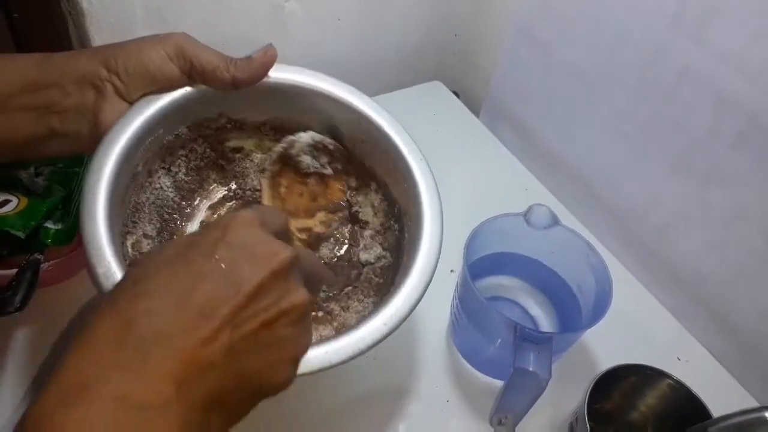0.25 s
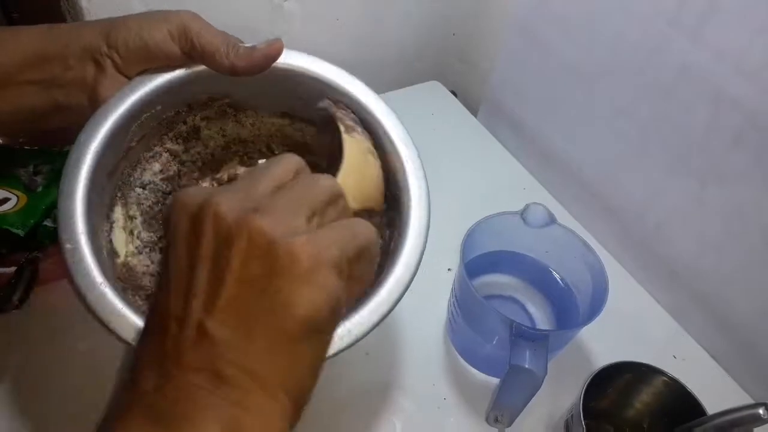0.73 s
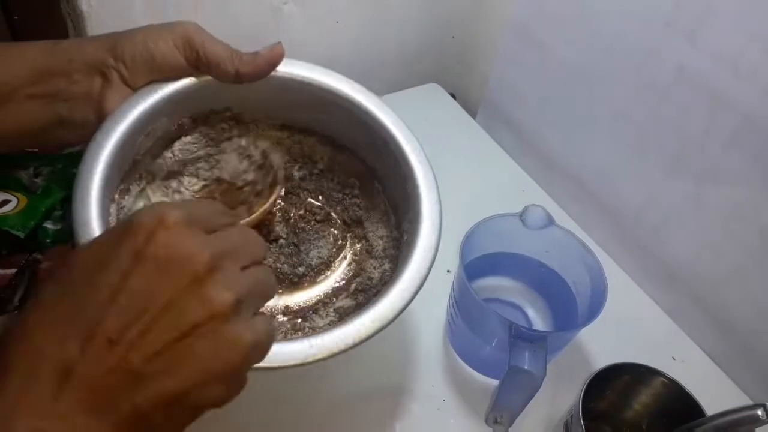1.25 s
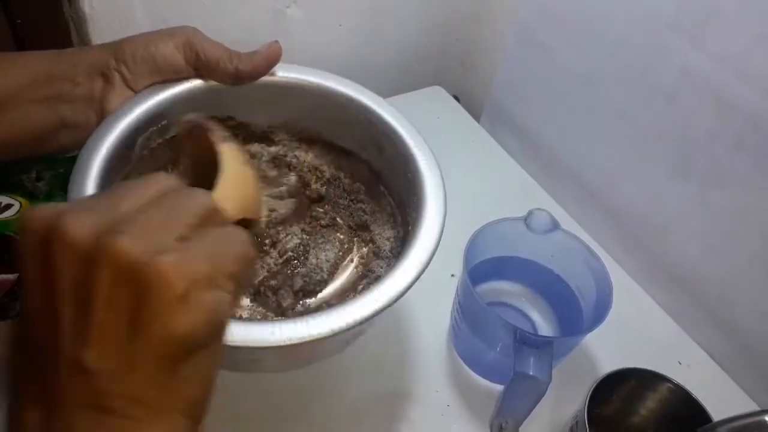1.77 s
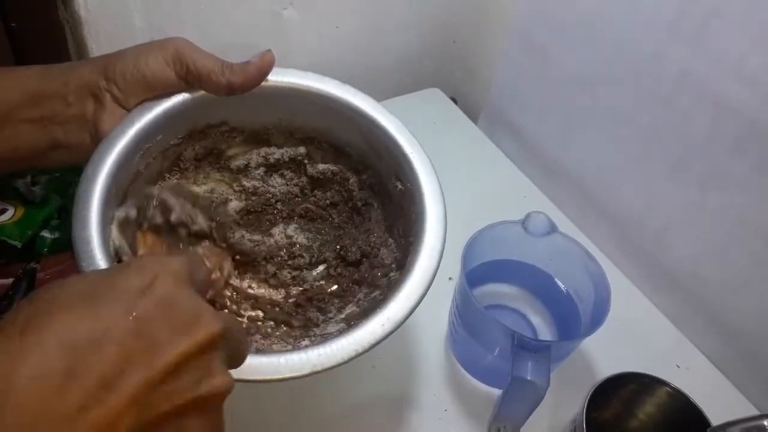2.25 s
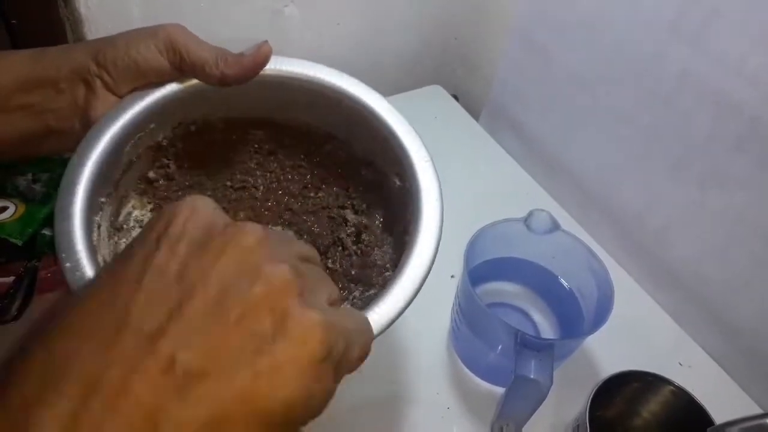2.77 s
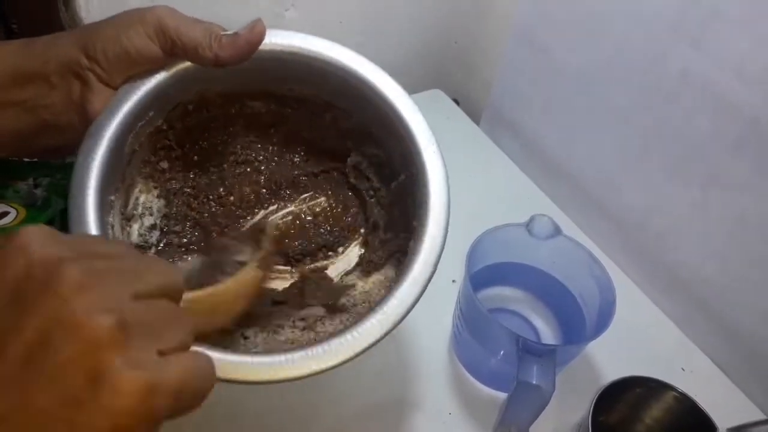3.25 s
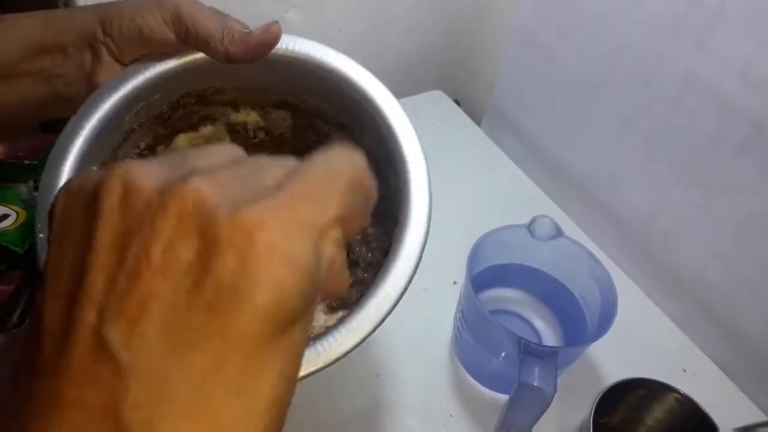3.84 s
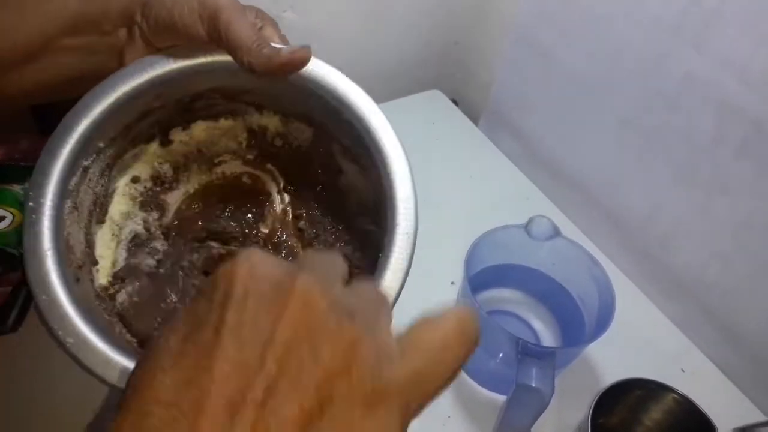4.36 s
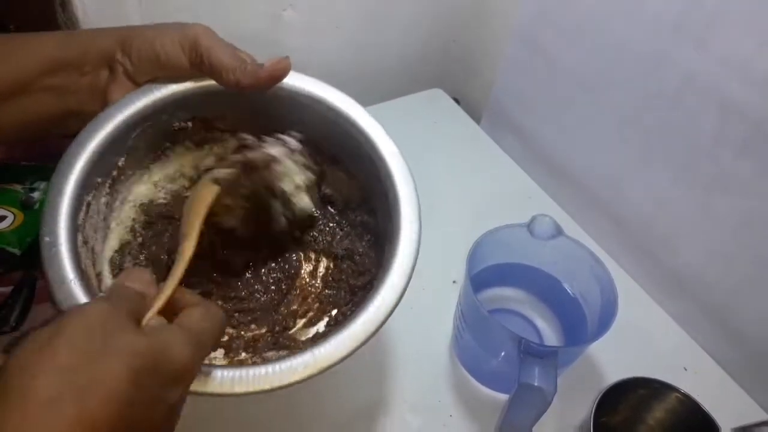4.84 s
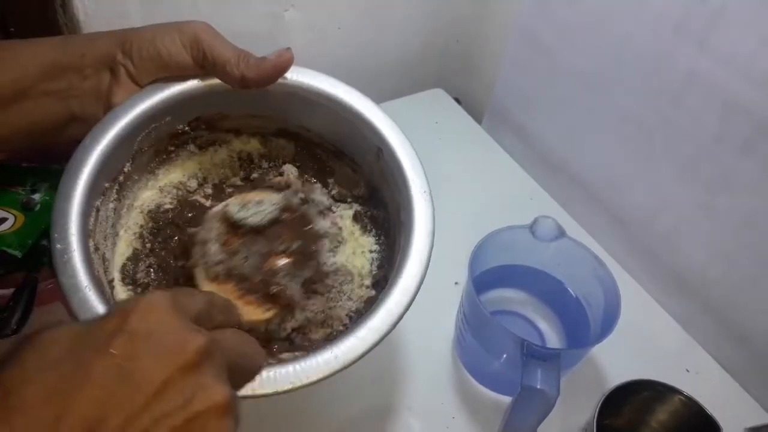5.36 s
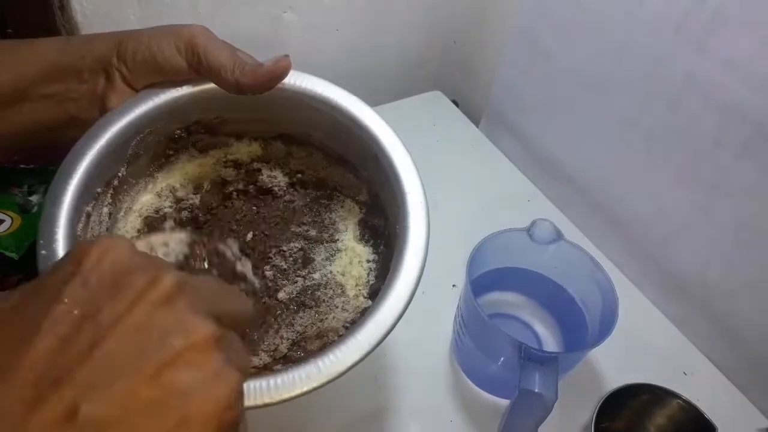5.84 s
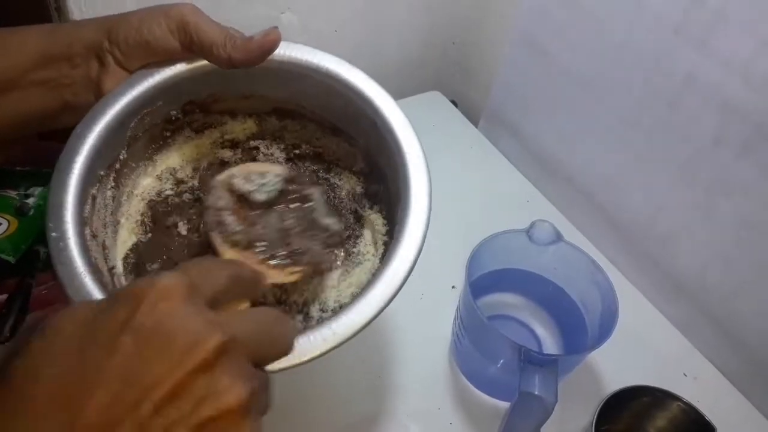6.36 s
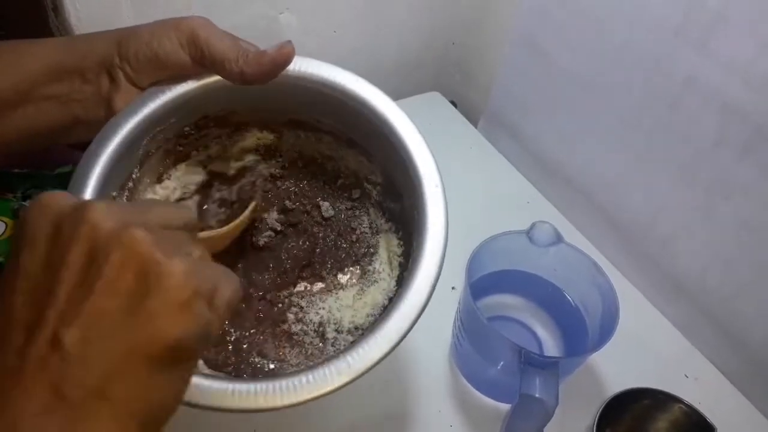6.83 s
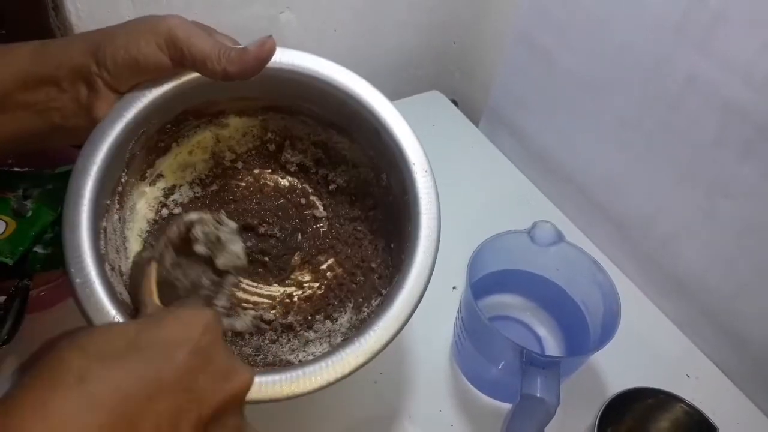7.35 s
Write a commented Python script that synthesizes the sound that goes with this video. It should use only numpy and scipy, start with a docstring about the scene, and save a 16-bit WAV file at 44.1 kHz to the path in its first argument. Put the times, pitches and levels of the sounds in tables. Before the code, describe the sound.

A wooden spoon stirs gritty damp powder in a metal pot, scraping and knocking, softening to faint swishes, then digging in again.

```python
"""A wooden spoon stirs a damp, gritty powder in a hand-held metal pot in a small kitchen.
Stick and slip of the spoon drive random forces through the resonant pot: grains crunch, the edge chatters, lumps shift.
Short blows make the knocks and falling thuds; a fast rasp rings the spoon, and light friction makes faint gliding tones.
For a while it only folds the loose powder on top, with soft swishes, then digs in again.
Filtered noise is the murmur of the room, and sparse decaying reflections are its echo."""
import sys
import numpy as np
from scipy import signal
from scipy.fft import rfft, irfft
from scipy.io import wavfile
from scipy.ndimage import uniform_filter1d

SR = 44100
rng = np.random.default_rng(int(sys.argv[2]) if len(sys.argv) > 2 else 0)


def generate_wav(sig):
    """Save sig (samples, or channels by samples) to the path in sys.argv[1] as 16-bit PCM at SR."""
    pcm = np.round(np.clip(np.atleast_2d(sig).T, -1, 1) * 32767).astype(np.int16)
    wavfile.write(sys.argv[1], SR, pcm)


N = 335160
BINS = np.fft.rfftfreq(8192, 1 / SR)

# reference bands for setting the energy of a filter: low and high edge in Hz
CRUNCH_BAND, RUB_BAND, PUSH_BAND = (3000, 15000), (1100, 2000), (300, 950)
FULL_BAND = (20, 16000)

# Resonances of the pot, damped by the hand and the mix.
# Each row: frequency in Hz, width at half the lift in Hz, lift in dB.
POT_MODES = [(227, 83, 9.5), (442, 70, 3), (592, 9.2, 6.5), (802.6, 39, 10.5), (1240, 140, 2),
             (1400, 270, 5.5), (1525, 160, 4), (1886, 34, 3.5), (2118, 34, 4), (2560, 49, 2),
             (3270, 17, 3.5), (3850, 9.5, 5), (6190, 190, 2.5), (7600, 62, 3), (8460, 100, 5),
             (8920, 140, 2), (12100, 120, 1)]
# Colour of the crunching grains. Each row: frequency in Hz, relative spectral density in dB.
CRUNCH_COLOUR = [(100, -38), (700, -17.5), (1500, -8), (2300, -0.5), (3500, -1), (5000, -0.5), (8500, -2),
                 (11000, -5), (14000, -8), (16000, -13)]
# Colour of the shoved lumps. Each row: frequency in Hz, relative spectral density in dB.
PUSH_COLOUR = [(30, -26), (110, -16), (220, -10), (320, -10.5), (450, 1), (700, 6), (1000, 0.5), (1500, -9),
               (4000, -36), (16000, -60)]


def amp(db):
    """Amplitude ratio from its logarithmic measure: 20 dB for each factor of ten."""
    return 10 ** (np.asarray(db) / 20)


def read(points, hz):
    """Interpolation of a spectrum by straight lines on a log-frequency axis."""
    f, value = np.transpose(points)
    return np.interp(np.log(hz + 1), np.log(f), value)


def add(mix, s, sound):
    """Superposition: a sound is summed into the mix from time s in seconds."""
    part = mix[max(round(s * SR), 0):][:len(sound)]
    part += sound[:len(part)]


def response(colour, modes, band):
    """Minimum-phase impulse response of a colour lifted by resonances, with unit energy inside the band."""
    db = read(colour, BINS)
    for hz, width, lift in modes:
        db = db + lift / (1 + (2 * (BINS - hz) / width) ** 2)
    inside = (BINS > band[0]) & (BINS < band[1])
    gain = amp(db) / np.sqrt(np.mean(amp(db) ** 2 * inside))
    log_gain = np.log(np.concatenate([gain, gain[-2:0:-1]]))
    # the Hilbert transform of the log gain gives the phase that makes the ring causal
    spectrum = np.exp(np.conj(signal.hilbert(log_gain)))
    return np.fft.ifft(spectrum).real[:len(BINS)]


def ring(force, colour, modes, band):
    """Linear response of a body: the force convolved with the impulse response."""
    return signal.oaconvolve(force, response(colour, modes, band))[:N]


def wander(rate_hz):
    """Slow random fluctuation of unit size: noise under a Gaussian low-pass of the given rate."""
    f = np.fft.rfftfreq(N, 1 / SR)
    x = irfft(rfft(rng.standard_normal(N)) * np.exp(-(f / rate_hz) ** 2), N)
    return x / x.std()


def grains(per_s, spread_db, grip_db, smooth, size=1800):
    """Granular friction: random clicks over smooth noise, bunched by the grip, at steady short-term power."""
    sizes = amp(spread_db * np.minimum(rng.exponential(1, N), 4)) * rng.choice([-1, 1], N)
    clicks = sizes * (rng.random(N) < per_s / SR)
    force = (clicks / clicks.std() + smooth * rng.standard_normal(N)) * amp(grip_db)
    power = uniform_filter1d(uniform_filter1d(force ** 2, size), size // 2)
    return force / np.sqrt(power)


def cracks(per_s, spread_db):
    """Brittle fracture: single hard grains snap at random times, each an impulse of random size."""
    sizes = amp(spread_db * np.minimum(rng.exponential(1, N), 2.5))
    return sizes * (rng.random(N) < per_s / SR)


def blow(t60, scatter, size=4096):
    """Impact: one impulse and an exponentially dying noise burst of crushed grains, of unit energy."""
    burst = rng.standard_normal(size) * amp(-60 * np.arange(size) / SR / t60)
    force = scatter * burst / np.linalg.norm(burst)
    force[0] += 1
    return force / np.linalg.norm(force)


def resonate(x, hz, width_hz):
    """Moving resonance: the input is turned down by the pitch, smoothed and turned back, at equal power."""
    turn = np.exp(2j * np.pi * np.cumsum(hz) / SR)
    r = np.exp(-np.pi * width_hz / SR)
    y = (turn * signal.lfilter([1], [1, -2 * r, r * r], x / turn)).real
    return y * x.std() / y.std()


def roam(x, patchy_db, count=9, order=4):
    """Varying excitation: as the contact roams over the pot, patches of its spectrum swell and fade."""
    z = signal.stft(x, nperseg=512, noverlap=384)[2]
    field = rng.standard_normal(z.shape)
    for _ in range(2):
        field = uniform_filter1d(field, count, axis=1)  # smooth along time
        field = uniform_filter1d(field, order, axis=0)  # smooth along frequency
    z = z * amp(patchy_db * field / field.std())
    y = signal.istft(z, nperseg=512, noverlap=384)[1][:N]
    return y * x.std() / y.std()


def air():
    """Stationary background: filtered noise with a slight flutter of level makes the low murmur of the room."""
    # Colour of the still kitchen. Each row: frequency in Hz, relative spectral density in dB.
    air_colour = [(15, -52.5), (25, -23), (59, -21), (99, -4), (152, -0.5), (221, -15.5), (274, -15),
                  (495, -29.5), (1110, -30), (1380, -40.5), (1750, -34), (6050, -34.5), (7300, -33.5),
                  (15500, -35.5)]
    level_db = -65
    flutter = amp(1.1 * wander(rate_hz=18))
    return amp(level_db) * ring(rng.standard_normal(N) * flutter, air_colour, [], FULL_BAND)


def kitchen(x, size=20):
    """Reverberation: sparse reflections from the near walls decay, the highest treble soonest."""
    # Decay of the echo. Each row: frequency in Hz, time to fall by 60 dB in seconds.
    echo_decay = [(200, 0.3), (1400, 0.28), (5000, 0.35), (15000, 0.058)]
    count = SR // 2 // size
    taps = np.zeros(SR)
    # one reflection at a random place in each slot of the given size in samples
    places = (np.arange(count) + 8) * size + rng.integers(0, size, count)
    taps[places] = rng.choice([-1, 1], count)
    hz, t, z = signal.stft(taps, SR, nperseg=256)
    decay = amp(-60 * t / read(echo_decay, hz)[:, None])
    tail = signal.istft(z * decay, SR, nperseg=256)[1]
    return signal.oaconvolve(x, tail / np.linalg.norm(tail))[:N]


def glides():
    """Friction-driven resonance: the wood sings faintly as light rubbing noise feeds narrow gliding modes."""
    # Glides of the wood on the metal. Each row: start in seconds, end in seconds, first pitch in Hz,
    # last pitch in Hz, width of the resonance in Hz, level before the fades in dB.
    glide_events = [(2.35, 2.43, 1390, 1420, 90, -67), (3.218, 3.432, 1005, 1040, 55, -68.5),
                    (4.755, 5.083, 1230, 1354, 85, -67), (5.213, 5.395, 1190, 1480, 130, -67),
                    (5.355, 5.43, 1770, 1980, 130, -69), (5.544, 5.68, 2410, 2420, 220, -72),
                    (5.95, 6.091, 562, 590, 45.8, -70.5), (6.223, 6.317, 2580, 2570, 220, -69)]
    out = np.zeros(N)
    for start, end, first_hz, last_hz, width_hz, db in glide_events:
        size = round((end - start) * SR)
        pitch = np.linspace(first_hz, last_hz, size)
        tone = resonate(rng.standard_normal(size), pitch, width_hz)
        add(out, start, amp(db) * tone * signal.windows.tukey(size, .6))
    return out


def skid():
    """Stick-slip: the dry edge skids once on the wall, and fast slips ring the spoon itself as it eases off."""
    # Colour of the skid. Each row: frequency in Hz, relative spectral density in dB.
    skid_colour = [(200, -21.5), (1200, -3.5), (4000, -8), (9000, -12.5), (16000, -22.5)]
    # Resonances of the skidding spoon. Each row: frequency in Hz, width at half the lift in Hz, lift in dB.
    spoon_modes = [(1276, 260, 14), (2215, 200, 17), (3020, 650, 14.5), (5960, 420, 12.5), (9540, 400, 5.5)]
    start_s, length_s, level_db, fall_db_per_s = 3.945, .11, -38, 51.5
    t = np.arange(N) / SR - start_s
    level = amp(level_db - fall_db_per_s * abs(t)) * (t > 0) * (t < length_s)
    force = grains(per_s=640, spread_db=1.5, grip_db=2.7 * wander(rate_hz=110), smooth=0.25)
    return roam(ring(force * level, skid_colour, spoon_modes, FULL_BAND), patchy_db=2)


def knocks():
    """Impact excitation: blows of wood ring the pot as thud, wall and gritty tick; lumps drop and boom."""
    # Knocks of the spoon on the pot. Each row: time in seconds, relative level in dB,
    # grit trapped under the spoon in dB, pitch of the struck spot in Hz.
    knock_events = [(0.0476, -23.5, -11.5, 1300), (0.1306, -19, -11, 1790), (0.2407, -22.5, 1.5, 790),
                    (0.3486, -21.5, -7, 1180), (0.3591, -22, -4, 850), (0.5007, -16, 2, 1130),
                    (0.5128, -15, -7, 1260), (0.621, -16, 7, 1470), (0.7152, -17, 3.5, 2160),
                    (0.7732, -22, 9, 1850), (1.1459, -19, -4, 820), (1.2116, -22, -4, 1540),
                    (1.6254, -16, 3, 1610), (1.959, -18, 4.5, 1470), (2.101, -17, 2, 1960),
                    (2.574, -15.5, 3, 1530), (2.7416, -21, 9.5, 1390), (2.7915, -23.5, 5.5, 1370),
                    (3.0009, -31, 6.5, 2930), (3.054, -14, 5.5, 1290), (3.0633, -19, 7, 1770),
                    (3.4258, -31, 0, 1720), (3.5743, -19.5, 1.5, 1440), (4.105, -23.5, -2.5, 1350),
                    (4.2607, -14, -8.5, 1460), (4.4028, -16.5, 6.5, 1430), (4.5956, -19.5, 3.5, 1680),
                    (4.6576, -32.5, 3, 1450), (6.4927, -29.5, 7.5, 1630), (6.5301, -22.5, 0, 2160),
                    (6.8697, -14.5, -2, 2650), (6.8815, -17, -2, 1320), (7.195, -27, 0.5, 1380)]
    # A lump gives way and the spoon drops on the bottom. Each row: time in seconds,
    # relative level in dB, relative boom of the bottom in dB.
    lump_events = [(0.831, -21, -64), (0.8821, -22, -58), (0.928, -20, -39), (0.96, -20.5, -57),
                   (0.976, -21, -52), (1.112, -26, -59), (1.6173, -17.5, -53), (3.489, -25.5, -50.5),
                   (4.154, -20.5, -47), (4.167, -25, -37), (4.42, -25.5, -45), (6.928, -28.5, -41.5),
                   (7.272, -29.5, -46.5), (7.285, -26, -50), (7.347, -27.5, -55.5)]
    # Colour of a knock. Each row: multiple of the spot's pitch, relative spectral density in dB.
    knock_colour = [(.05, -43), (.3, -20), (.6, -4), (1, 6), (1.5, -1.5), (2.1, -3), (3.5, -15), (9, -37)]
    # Colour of the thud under a knock. Each row: frequency in Hz, relative spectral density in dB.
    thud_colour = [(40, -34.5), (220, -23.5), (330, -12), (470, -2.5), (720, 0.5), (1000, -2.5),
                   (1500, -18), (16000, -63)]
    # Colour of the flexing bottom. Each row: frequency in Hz, relative spectral density in dB.
    boom_colour = [(40, -36), (120, -21), (210, 6.5), (300, -8.5), (600, -32), (16000, -68.5)]
    # offsets against the knock, ahead of the mix gains; grit sharpens the tick and softens the thud by as much
    thud_db, tick_db = -17.5, -13
    boom, thud, lump, wall, tick = np.zeros((5, N))
    for s, level_db, grit_db, hz in knock_events:
        spot_colour = [(hz * multiple, db) for multiple, db in knock_colour]  # stiffer spots ring higher
        spot = response(spot_colour, POT_MODES, FULL_BAND)
        add(wall, s, amp(level_db) * signal.fftconvolve(blow(t60=0.033, scatter=2.1), spot))
        add(thud, s, amp(level_db + thud_db - grit_db) * blow(t60=0.028, scatter=0.97))
        add(tick, s, amp(level_db + tick_db + grit_db) * blow(t60=0.035, scatter=9.4))
    for s, level_db, boom_db in lump_events:
        add(lump, s, amp(level_db) * blow(t60=0.042, scatter=1.0))
        add(boom, s, amp(boom_db) * blow(t60=0.021, scatter=0.6))
    return (amp(16.5) * ring(thud, thud_colour, POT_MODES, FULL_BAND)
            + amp(16.0) * wall
            + amp(22.5) * ring(tick, CRUNCH_COLOUR, POT_MODES, FULL_BAND)
            + amp(16.5) * ring(lump, PUSH_COLOUR, POT_MODES, FULL_BAND)
            + amp(22.5) * ring(boom, boom_colour, POT_MODES, FULL_BAND))


def pressure(t, rise, hold):
    """Exponential envelope in dB, t seconds into a stroke: the spoon digs in, holds, lets go; powder trickles back."""
    swell_db, release_db_per_s = 22, 270
    trickle_db, trickle_db_per_s = -21.5, 96
    after = np.maximum(t - rise - hold, 0)
    release = np.maximum(-release_db_per_s * after, trickle_db - trickle_db_per_s * after)
    return swell_db * np.minimum(t / rise - 1, 0) + release


def spoon(size=32):
    """Masking by the firmest contact: the strongest stroke sets each level, and power weights the rub's pitch."""
    # Pushes of the spoon through the mix. Each row: start in seconds, rise in seconds, hold in seconds,
    # relative crunch of the grains in dB, relative rub of the edge on the metal in dB,
    # relative push on the lumps in dB, pitch of the rub at full pressure in Hz.
    strokes = [(0.039, 0.0056, 0.015, -43, -35.5, -43, 1460),
               (0.086, 0.053, 0.024, -32.5, -29.5, -38.5, 1612),
               (0.13, 0.038, 0.29, -44.5, -40, -45.5, 1456), (0.384, 0.092, 0.05, -40, -38.5, -45.5, 1336),
               (0.601, 0.015, 0.036, -37.5, -44.5, -52.5, 1525), (0.656, 0.051, 0.1, -40, -40, -49, 2165),
               (0.753, 0.062, 0.25, -36, -35, -42.5, 1656), (1.079, .1, 0.081, -43, -35, -45, 1350),
               (1.608, 0.009, 0.048, -40.5, -30.5, -35.5, 1710), (1.712, .14, 0.085, -45, -55, -68, 1450),
               (1.874, 0.05, 0.072, -37, -36.5, -51, 1580), (1.969, 0.057, 0.061, -36, -33, -41, 1734),
               (2.336, 0.038, .05, -61.5, -71.5, -90, 1390), (2.416, 0.036, .065, -34.5, -34, -57, 1640),
               (2.442, 0.083, 0.054, -30.5, -33, -39.5, 1614), (2.596, .1, .05, -45, -45, -49.5, 1364),
               (2.752, .04, 0.033, -37.5, -34, -41, 1418), (2.979, 0.028, 0.045, -38.5, -46, -52, 1422),
               (3.032, .02, 0.037, -37, -32.5, -38.5, 1622), (3.059, .07, 0.029, -28, -32, -39, 1785),
               (3.41, .024, 0.03, -40.5, -32, -63, 1714), (3.422, .055, .055, -34, -33, -39.5, 1506),
               (3.542, 0.032, 0.054, -35.5, -37, -43.5, 1443),
               (3.945, 0.0052, 0.09, -53.5, -45, -53.5, 1677), (4.092, 0.019, .05, -44, -34.5, -43, 1420),
               (4.105, .06, 0.092, -36, -24, -41, 1450), (4.186, .06, 0.32, -38, -35, -41, 1510),
               (4.373, .04, 0.067, -38, -26, -38, 1430), (4.467, 0.06, .085, -41.5, -31.5, -43.5, 1523),
               (4.601, .04, 0.037, -52.5, -41.5, -46.5, 1330), (4.7, 0.18, .07, -68, -73, -81, 1280),
               (5.191, .14, 0.062, -60, -61.5, -78.5, 1470), (5.546, 0.073, 0.059, -57.5, -62, -81.5, 1743),
               (5.593, 0.098, 0.098, -54, -58.5, -82.5, 1433), (5.977, 0.18, 0.024, -54, -56, -69, 1494),
               (6.36, 0.1, 0.024, -51, -61, -74, 1790), (6.499, .036, 0.01, -32, -34, -51, 2106),
               (6.712, .05, .035, -43.5, -40, -61.5, 1483), (6.786, .08, .06, -44, -44.5, -53, 1350),
               (6.894, 0.066, .2, -47.5, -51.5, -58.5, 1640), (7.113, 0.1, 0.085, -45, -41, -47, 1438),
               (7.272, 0.054, 0.04, -47, -52.5, -52, 1197)]
    light_hz = 1370  # under a light touch the rub settles on the wall's own pitch
    lump_steepness = 0.97  # dB of push per dB of pressure
    t = np.arange(0, N, size) / SR
    crunch_db, rub_db, push_db, hz = np.transpose(strokes)[3:, :, None]
    press_db = np.array([pressure(t - s, rise, hold) for s, rise, hold, *_ in strokes])
    share = amp(rub_db + press_db) ** 2 + 1e-30
    shift_hz = (hz - light_hz) * amp(press_db / 2)
    pitch = light_hz + (share * shift_hz).sum(0) / share.sum(0)
    crunch = (crunch_db + press_db).max(0)
    rub = (rub_db + press_db).max(0)
    push = (push_db + lump_steepness * press_db).max(0)
    return [np.interp(np.arange(N) / SR, t, curve) for curve in (crunch, rub, push, pitch)]


def stirring():
    """Stick-slip friction: each slip of the spoon crushes grains, shakes the pot and shoves lumps."""
    # Colour of the rub on the metal. Each row: frequency in Hz, relative spectral density in dB.
    rub_colour = [(100, -32), (600, -19), (1000, -11.5), (1400, 2.5), (1900, -3), (2700, -10), (4000, -12),
                  (7000, -29.5), (16000, -41)]
    # Colour of the coarse grains. Each row: frequency in Hz, relative spectral density in dB.
    rasp_colour = [(100, -36), (900, -14.5), (1900, 2), (2600, 2), (3800, 0), (6000, -10), (16000, -46.5)]
    crunch_db, rub_db, push_db, rub_hz = spoon()
    slips = wander(rate_hz=97)
    uneven_db = 2.04 * wander(rate_hz=24.8)  # the resistance of the mix varies within a stroke

    fine = grains(per_s=3500, spread_db=1.5, grip_db=2.1 * slips, smooth=0.52)
    fine = fine + amp(7.5) * cracks(per_s=70, spread_db=4.5)
    coarse = grains(per_s=900, spread_db=1.5, grip_db=1.2 * slips, smooth=0.6)
    coarse = coarse + amp(15.5) * cracks(per_s=52, spread_db=4.5)
    chatter = grains(per_s=820, spread_db=4.0, grip_db=2.9 * slips, smooth=0.63)
    judder = grains(per_s=630, spread_db=-1.0, grip_db=1.6 * slips, smooth=0.19)
    judder = resonate(judder, rub_hz, width_hz=600)
    shoves = grains(per_s=330, spread_db=3.0, grip_db=0.93 * slips, smooth=.5)

    # coarse grains break only under pressure, so they fade faster than the rest in gentle strokes
    rasp_db = -36.5 + 1.35 * (0.67 * crunch_db + 0.34 * rub_db + 34)
    fine_force = fine * amp(crunch_db + 0.33 * uneven_db)
    coarse_force = coarse * amp(rasp_db + uneven_db)
    rub_level = amp(rub_db + uneven_db)
    push_force = shoves * amp(push_db + 0.86 * uneven_db)
    contact = (amp(-2.5) * ring(fine_force, CRUNCH_COLOUR, POT_MODES, CRUNCH_BAND)
               + ring(coarse_force, rasp_colour, POT_MODES, FULL_BAND)
               + amp(-7.0) * ring(chatter * rub_level, rub_colour, POT_MODES, RUB_BAND)
               + amp(-4.0) * judder * rub_level
               + amp(-1.5) * ring(push_force, PUSH_COLOUR, POT_MODES, PUSH_BAND))
    return roam(contact, patchy_db=2.5)


def scene():
    """Superposition of the direct sound of the pot, its echo and the room."""
    pot = stirring() + knocks() + skid() + glides()
    return (pot + amp(-15) * kitchen(pot) + air())[None]


def record(dry):
    """Band limitation: a linear-phase low-pass filter removes the highest treble."""
    edge_hz = 15850
    low_pass = signal.firwin(511, edge_hz, window=("kaiser", 9), fs=SR)
    return signal.oaconvolve(dry, low_pass[None], "same")


dry = scene()
out = record(dry)
generate_wav(out)
```